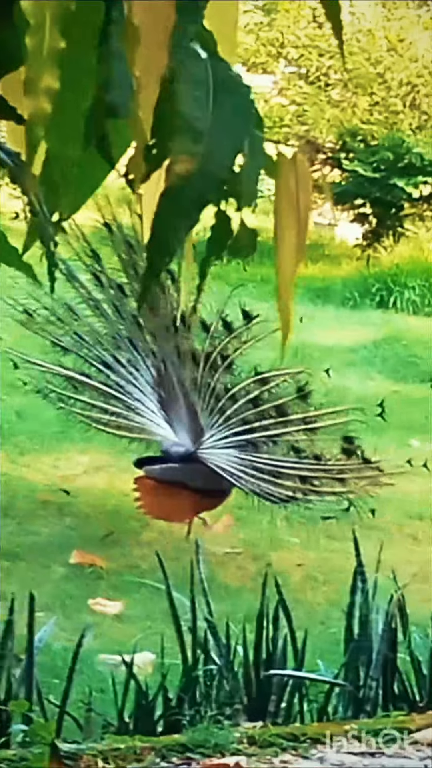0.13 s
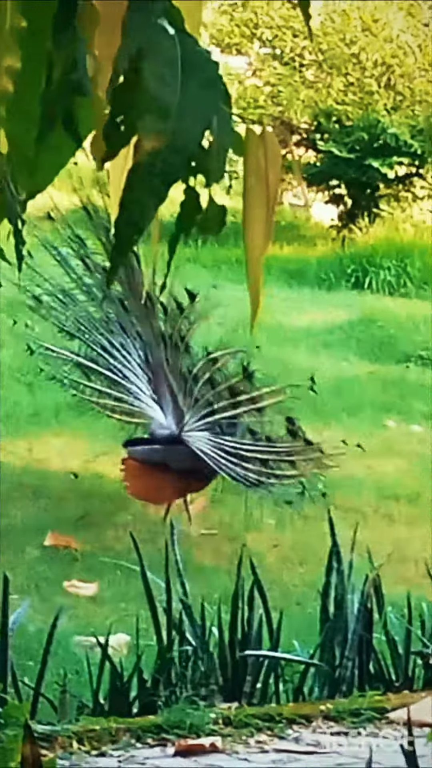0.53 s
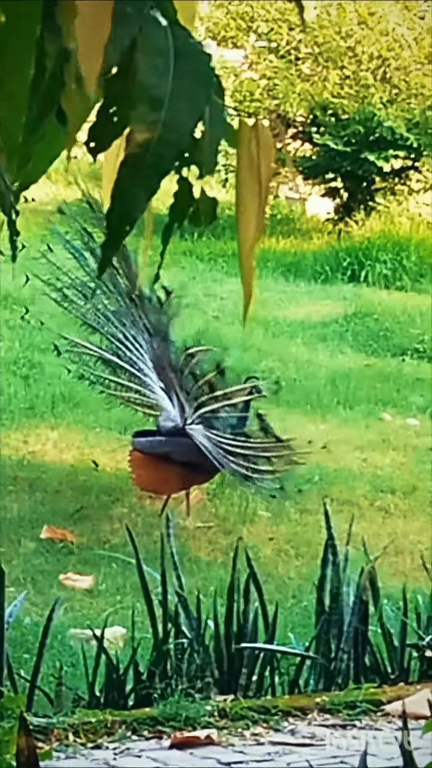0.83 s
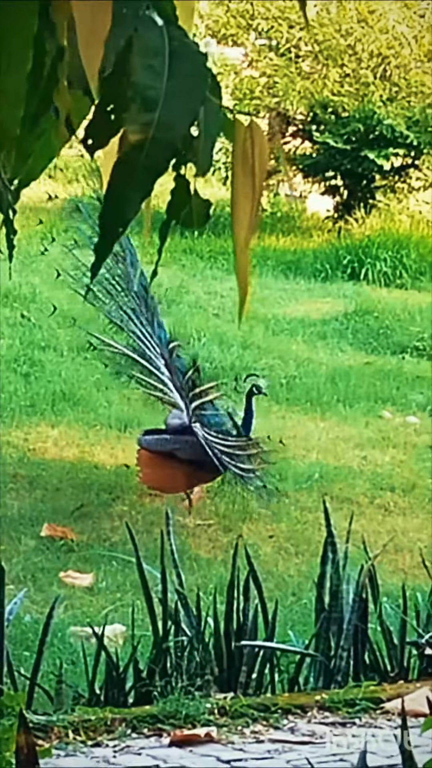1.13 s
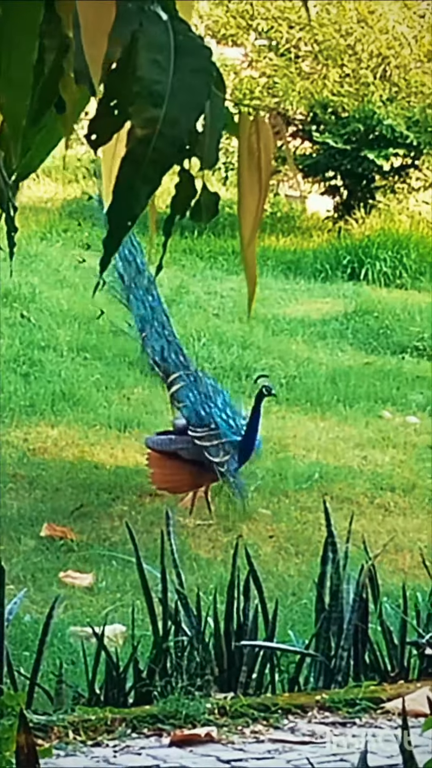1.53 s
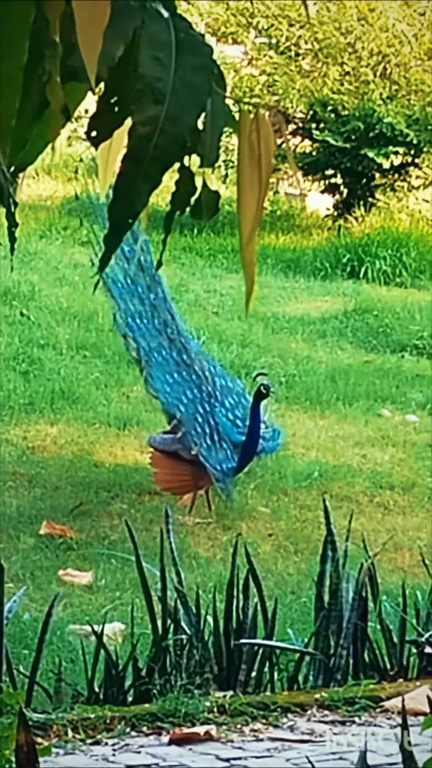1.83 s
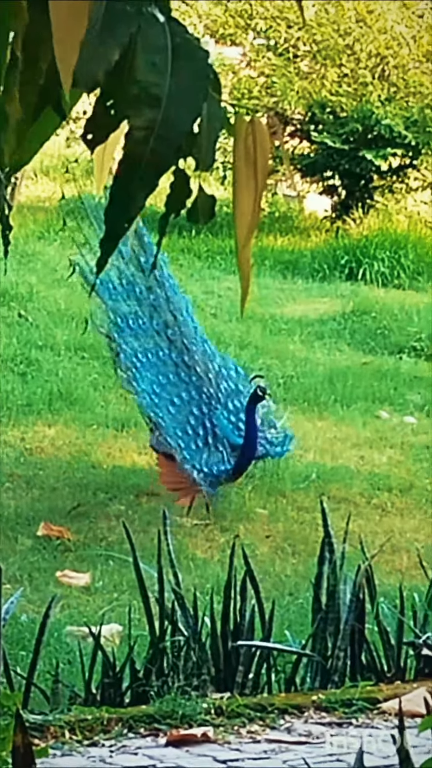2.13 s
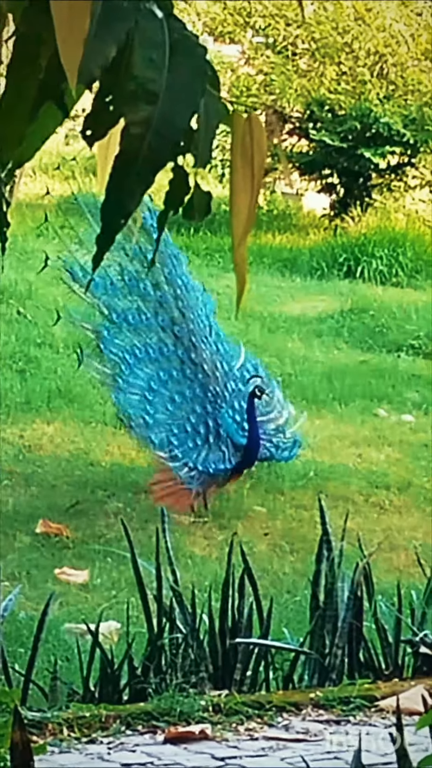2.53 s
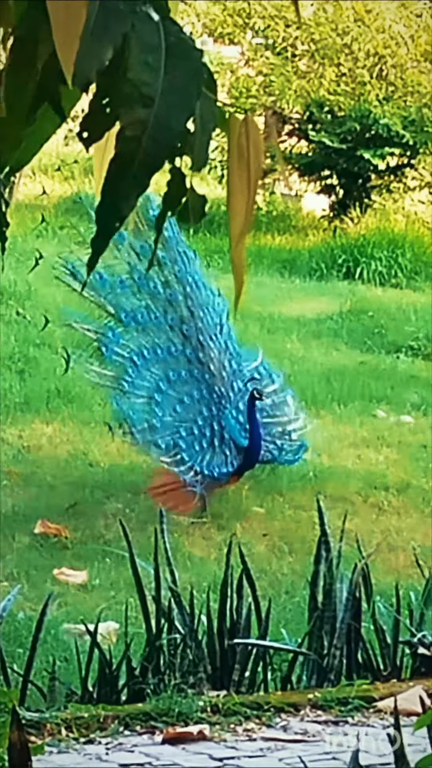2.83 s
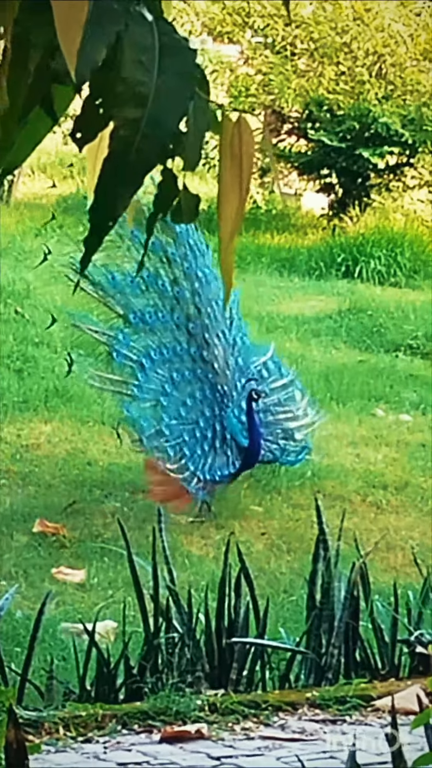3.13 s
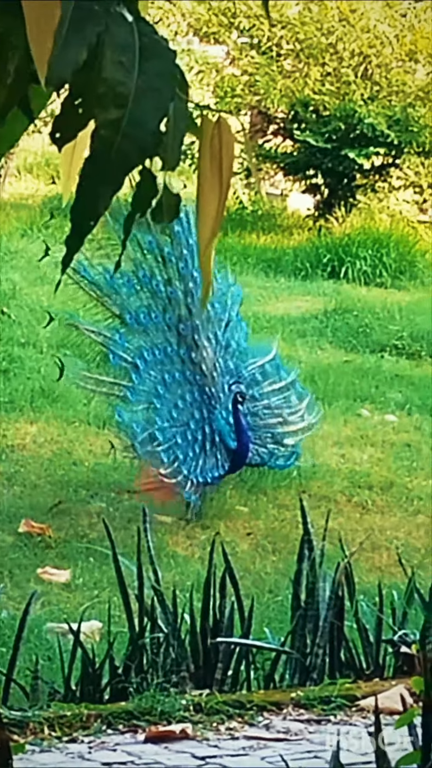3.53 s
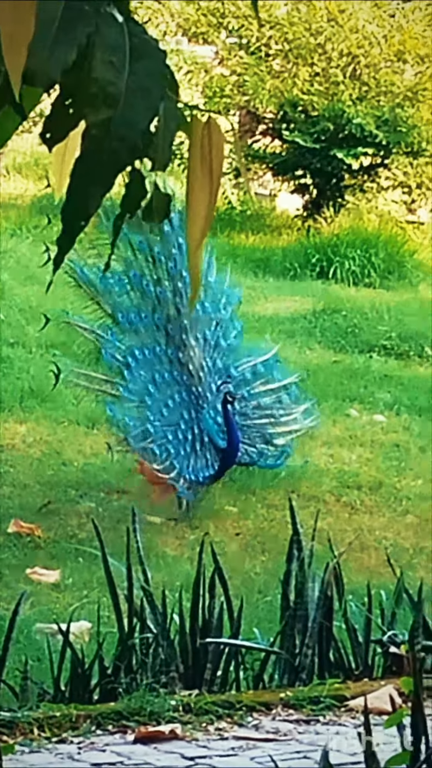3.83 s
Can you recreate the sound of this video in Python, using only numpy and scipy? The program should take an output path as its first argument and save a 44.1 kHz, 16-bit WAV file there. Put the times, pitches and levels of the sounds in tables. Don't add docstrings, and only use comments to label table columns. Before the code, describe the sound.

After a quiet stretch of garden air and one faint far call, a dry feathery rasp comes, then a peacock honks twice and cries three times, echoing off walls and trees around a stereo microphone.

```python
import sys
import numpy as np
from scipy import signal
from scipy.fft import rfft, irfft, next_fast_len
from scipy.io import wavfile
from scipy.ndimage import uniform_filter1d

SR = 44100
rng = np.random.default_rng(int(sys.argv[2]) if len(sys.argv) > 2 else 0)


def materialize(psi):
    bounded = np.clip(np.atleast_2d(psi).T, -1, 1)
    quanta = np.round(bounded * 32767).astype(np.int16)
    wavfile.write(sys.argv[1], SR, quanta)


def voltage_ratio(decibels):
    exponent = np.asarray(decibels, float) / 20
    return 10 ** exponent


N = 176400

# start t/s, crest t/s, end t/s, crest f/Hz, level/dB
HONKS = [
    (2.098, 2.15, 2.19, 615.4, -26),
    (2.258, 2.40, 2.47, 624.7, -20),
]
# start t/s, crest t/s, end t/s, crest f/Hz, level/dB
CRIES = [
    (2.677, 2.918, 3.051, 612.4, -22.5),
    (3.202, 3.368, 3.476, 615, -22.5),
    (3.628, 3.798, 3.92, 617.7, -22.5),
]
# rise f/Hz, rise bend, fall f/Hz, fall bend
HONK_ARCH = (42, 3.44, 71, 3.5)
CRY_ARCH = (110, 2.5, 88, 2.6)
# attack t/s, swell level/dB, release t/s, fade level/dB
HONK_SHAPE = (0.012, 5.5, 0.014, 5.6)
CRY_SHAPE = (0.017, 6.1, 0.005, 5.7)
# breath level/dB at the crest, breath level/dB at the ends, pitch jitter at the ends [0-1]
HONK_ROUGH = (-17.5, -18.5, 0.011)
CRY_ROUGH = (-42.5, -2, 0.03)
# f/Hz, width f/Hz, level/dB
SHUT_THROAT = [(630, 374, -12), (1196, 126.5, 2), (1780, 110, -46), (2560, 650, -23), (2730, 99, -21),
               (3420, 410, -38.5), (7600, 670, -29), (8800, 890, -27.5), (13400, 2500, -51)]
OPEN_THROAT = [(630, 400, -11), (1131, 84, -3), (1867, 224, -0.5), (2370, 314, -0.5), (2827, 174, -4.5),
               (3630, 238, -9), (5120, 710, -18.5), (6610, 670, -19.5), (7970, 870, -22.5),
               (10200, 1100, -28), (13000, 2700, -32.5)]
# f/Hz, level/dB, fade t/s
FLUTTER = [(1175, -3, 0.19), (1040, -19, 0.37), (800, -26, 0.39)]
# t/s, level/dB
CLICKS = [
    (2.067, -38),
    (2.079, -49),
    (2.244, -33),
    (2.672, -45),
]
# t/s, level/dB
RASP_SWELL = [
    (1.17, -78),
    (1.2, -58),
    (1.245, -47),
    (1.316, -44),
    (1.582, -47.5),
    (1.64, -53.5),
    (1.7, -45.5),
    (1.788, -51.5),
    (1.824, -49),
    (1.96, -65),
]
# f/Hz, width f/Hz, level/dB
RASP_BODY = [(2380, 1180, -0.5), (3400, 1400, -9), (4570, 1370, 1.5), (5900, 1100, -2.5),
             (6920, 1600, -4.5), (8940, 1400, -5), (13070, 1300, -9.5)]
# start t/s, length t/s, from f/Hz, to f/Hz, level/dB
WHISTLES = [
    (1.178, 0.063, 2520, 2470, -54.5),
    (1.244, 0.065, 2336, 2317, -54.5),
    (1.657, 0.048, 2680, 2560, -56.5),
]
WHISTLE_ORDERS = [1.5, 2.5, -10, -13]
# start t/s, length t/s, level/dB
FAR_CALL = (0.685, 0.5, -64.5)
# f/Hz, width f/Hz, level/dB
FAR_BANDS = [(1167, 77, 1), (1605, 76, -6)]
# f/Hz, width f/Hz, level/dB
INSECT_BANDS = [(5886, 1220, -0.5), (7920, 710, -8.5), (9990, 1740, -15.5), (3670, 1800, -28.5),
                (12000, 1200, -19)]
# f/Hz, level/dB per Hz
AIR_TONE = [(12, -30), (20, 0), (113, -3.5), (274, -16.5), (581, -18.5), (990, -19), (1160, -20.5),
            (2460, -25.5), (4000, -28), (5200, -51), (8800, -120)]
# f/Hz, likeness [-1 to 1]
LIKENESS = [(60, 0.8), (230, 0.79), (920, 0.39), (3600, -0.0035), (14100, -0.05)]
# f/Hz, left leads by [rad]
LEAD = [(100, 0.01), (600, 0.05), (1200, 1.98), (2000, 1.2), (4000, 1.37), (8000, 2), (14000, 1.97)]
# f/Hz, left minus right level/dB
PAN = [(60, -2), (180, -2), (530, -0.5), (1200, 7.5), (2200, 3), (3300, 1.5), (5500, 1.5), (14100, 4)]
# delay t/s, spread t/s, left level/dB, right level/dB
SLAPS = [
    (0.036, 0.0031, -11, -3),
    (0.0766, 0.02, -11, -8.5),
]
# f/Hz, margin level/dB
MASK_MARGIN = [(400, 40), (900, 20), (2000, 16), (3500, 11), (5500, 16), (8200, 14), (9500, 4), (11000, 1),
               (13500, 3)]


def rms_one(x):
    return x / np.sqrt(np.mean(x ** 2) + 1e-20)


def at_hz(points, hz):
    table = np.array(points)
    return np.interp(np.log(hz + 1.), np.log(table[:, 0]), table[:, 1])


def drift(rate_hz):
    r = np.exp(-2 * np.pi * rate_hz * 20 / SR)
    slow = signal.lfilter([1], [1, -2 * r, r * r], rng.standard_normal(N // 20 + 3002))
    slow = slow[3000:]
    return np.interp(np.arange(N) / 20, np.arange(len(slow)), rms_one(slow - slow.mean()))


def resonate(x, body, count=1):
    out = 0
    for k, (hz, width_hz, db) in enumerate(body):
        r = np.exp(-np.pi * width_hz / SR)
        top = (1 - r * r) / 2 * np.array([1, 0, -1])
        bottom = [1, -2 * r * np.cos(2 * np.pi * hz / SR), r * r]
        y = x + 1e-18
        for _ in range(count):
            y = signal.lfilter(top, bottom, y)
        out = out + (-1) ** k * voltage_ratio(db) * y
    return out


def gate(t, start, end, attack, release):
    ramp = np.minimum((t - start) / attack, (end - t) / release)
    return np.sin(np.pi / 2 * np.clip(ramp, 0, 1)) ** 2


def voice(calls, arch, shape, rough, flutter=()):
    t, out = np.arange(N) / SR, np.zeros(N)
    wobble, waver = drift(135), drift(16.7)
    bright = signal.butter(2, 2500, "high", fs=SR, output="sos")
    breath = signal.sosfilt(bright, rng.standard_normal(N))
    orders = np.arange(1, 24)[:, None]
    rise_hz, rise_bend, fall_hz, fall_bend = arch
    attack_s, swell_db, release_s, fade_db = shape
    crest_breath_db, end_breath_db, jitter = rough
    for start, crest, end, hz, db in calls:
        part = slice(int(start * SR), int(end * SR))
        u = t[part]
        early = np.clip((crest - u) / (crest - start), 0, 1)
        late = np.clip((u - crest) / (end - crest), 0, 1)
        edge = np.maximum(early, 0.946 * late) ** 2
        pitch = hz - rise_hz * early ** rise_bend - fall_hz * late ** fall_bend
        phase = 2 * np.pi * np.cumsum(pitch * (1 + jitter * edge * wobble[part])) / SR
        shimmer = waver[(np.arange(part.start, part.stop) + orders * (N // 24)) % N]
        overtone = voltage_ratio(4.5 * shimmer * np.minimum(orders / 9.0, 1))
        pulses = (overtone * np.cos(orders * phase)).sum(axis=0)
        for side_hz, side_db, fade_s in flutter:
            fading = voltage_ratio(side_db) * np.exp(-((u - start) / fade_s) ** 2)
            pulses = pulses + fading * np.cos(2 * np.pi * side_hz * (u - start))
        breath_level = 16.0 * voltage_ratio(crest_breath_db + (end_breath_db - crest_breath_db) * edge)
        hiss = breath_level * breath[part] * (1 + np.cos(phase))
        level = voltage_ratio(db - swell_db * early ** 2 - fade_db * late ** 2)
        out[part] = (pulses + hiss) * level * gate(u, start, end, attack_s, release_s)
    return out


def peacock():
    t = np.arange(N) / SR
    beak = sum(gate(t, start + 0.017, end + .1, 0.05, .01) for start, crest, end, hz, db in CRIES)
    honks = voice(HONKS, HONK_ARCH, HONK_SHAPE, HONK_ROUGH, FLUTTER)
    source = honks + voice(CRIES, CRY_ARCH, CRY_SHAPE, CRY_ROUGH)
    return resonate(source * (1 - beak), SHUT_THROAT) + resonate(source * beak, OPEN_THROAT)


def throat_clicks():
    x = np.zeros(N)
    for s, db in CLICKS:
        x[int(s * SR)] = 160 * voltage_ratio(db)
    return resonate(x, [(766, 64, 0), (960, 110, -3)], count=2)


def rasp():
    t = np.arange(N) / SR
    s, db = np.transpose(RASP_SWELL)
    level = voltage_ratio(np.interp(t, s, db) + 1.0 * drift(25)) * gate(t, s[0], s[-1], 0.022, 0.06)
    grains = rng.standard_normal((2, N)) * voltage_ratio(0.59 * drift(400))
    crossed = grains + 0.053 * grains[::-1]
    out = level * rms_one(resonate(crossed, RASP_BODY, count=2))
    waver = drift(62)
    for start, length, from_hz, to_hz, db in WHISTLES:
        glide = np.interp(t, [start, start + length], [from_hz, to_hz])
        phase = 2 * np.pi * np.cumsum(glide * (1 + 0.014 * waver)) / SR
        tone = sum(voltage_ratio(g) * np.sin((k + 1) * phase) for k, g in enumerate(WHISTLE_ORDERS))
        out = out + voltage_ratio(db) * tone * gate(t, start, start + length, 0.0085, 0.024)
    return out


def garden(x):
    t, size = np.arange(SR) / SR, next_fast_len(N + SR)
    noise = rng.standard_normal((2, 2, SR))
    near = noise[0] * (rng.random((2, SR)) < 300 / SR) * voltage_ratio(-60 * t / 0.18) * (t > .01)
    far = signal.lfilter(*signal.butter(1, 7700, fs=SR), noise[1]) * voltage_ratio(-60 * t / 1.17) * (t > .05)
    layers = [(-13, near), (-14, far)]
    for delay, spread, left_db, right_db in SLAPS:
        cluster = noise[0] * np.exp(-((t - delay) / spread) ** 2)
        layers.append((np.array([[left_db], [right_db]]), cluster))
    tail = sum(voltage_ratio(db) * h / np.sqrt((h ** 2).sum(axis=1, keepdims=True)) for db, h in layers)
    hz, sides = np.fft.rfftfreq(size, 1 / SR), np.array([[.5], [-.5]])
    ports = voltage_ratio(sides * at_hz(PAN, hz)) * np.exp(1j * sides * at_hz(LEAD, hz))
    echoes = rfft(tail, size)
    alike = 1 / (1 + (hz / 680) ** 6)
    response = ports + alike * echoes.mean(axis=0) + (1 - alike) * echoes
    return irfft(rfft(x, size) * response, size)[:, :N]


def far_call():
    start, length, db = FAR_CALL
    fade = gate(np.arange(N) / SR, start, start + length, .05, 0.2)
    return voltage_ratio(db) * fade * rms_one(resonate(rng.standard_normal((2, N)), FAR_BANDS, count=2))


def insects():
    hiss = resonate(rng.standard_normal((2, N)), INSECT_BANDS, count=2)
    sway_db = 1.9 * drift(1.2) + 0.57 * drift(38)
    return voltage_ratio(-59 + 3.5 + sway_db) * rms_one(hiss)


def air():
    hz = np.fft.rfftfreq(N, 1 / SR)
    mid, side = rfft(rng.standard_normal((2, N)))
    alike = np.clip(at_hz(LIKENESS, hz), 0, .98)
    both = np.sqrt(1 + alike) * mid + np.sqrt(1 - alike) * side * [[1], [-1]]
    steep = 1 / np.sqrt(1 + (hz / 4500) ** 6) * (hz > 12)
    noise = irfft(both * voltage_ratio(at_hz(AIR_TONE, hz)) * steep, N)
    return voltage_ratio(-52.5 + 0.33 * drift(12.0)) * rms_one(noise)


def scene():
    return garden(peacock() + throat_clicks()) + rasp() + far_call() + insects() + air()


def mask(x):
    hz, _, z = signal.stft(x, SR, nperseg=2048, noverlap=1536)
    power = (abs(z[:, :1024]) ** 2).sum(axis=0)
    bands = power.reshape(128, 8, -1).mean(axis=1) + 1e-18
    under_db = 10 * np.log10(bands / uniform_filter1d(bands, size=13, axis=0))
    chance = rms_one(uniform_filter1d(rng.standard_normal(bands.shape), size=5, axis=1))
    spare_db = under_db + at_hz(MASK_MARGIN, hz[4:1024:8])[:, None] + 5.5 * chance
    cut = voltage_ratio(-34 * np.clip(.5 - spare_db / 4, 0, 1))
    z[:, :1024] *= np.repeat(cut, 8, axis=0)
    return signal.istft(z, SR, nperseg=2048, noverlap=1536)[1][:, :N]


def roll_off(x):
    return signal.sosfilt(signal.butter(12, 14690, fs=SR, output="sos"), x)


def record(dry):
    top_cut = signal.cheby2(12, 70, 14900, fs=SR, output="sos")
    mix = mask(signal.sosfilt(top_cut, dry))
    return roll_off(mix)


dry = scene()
out = record(dry)
materialize(out)
```